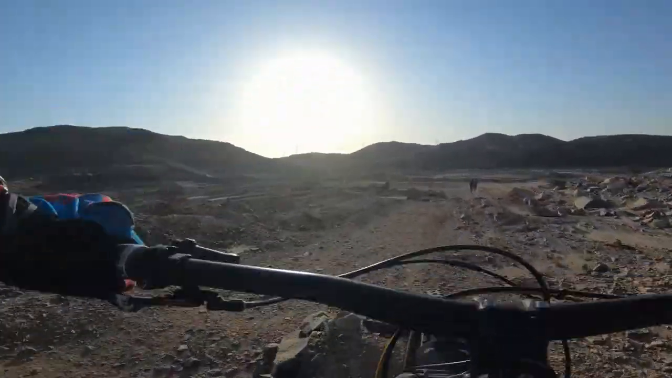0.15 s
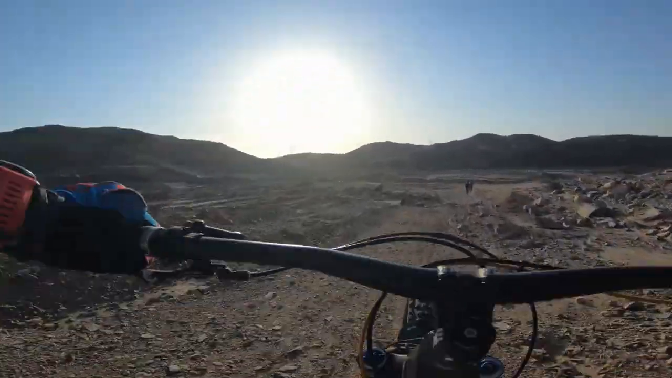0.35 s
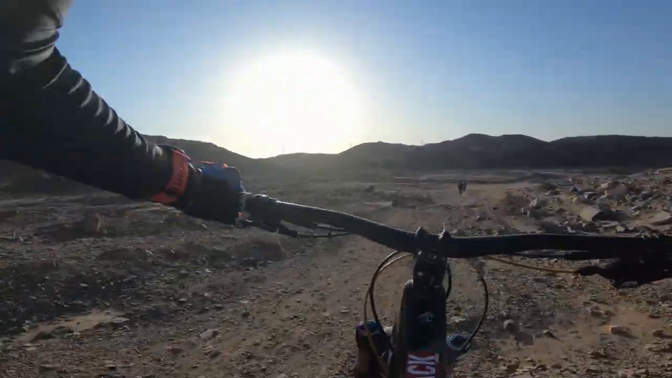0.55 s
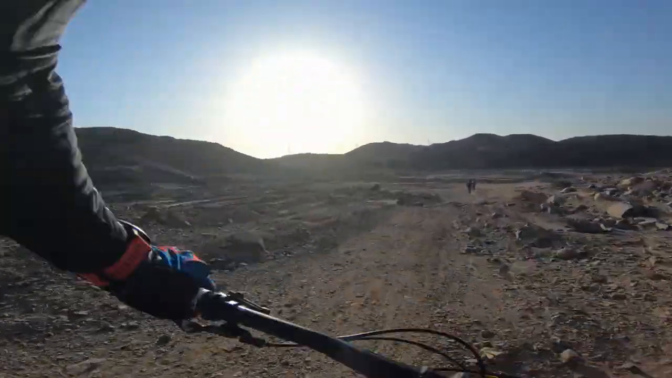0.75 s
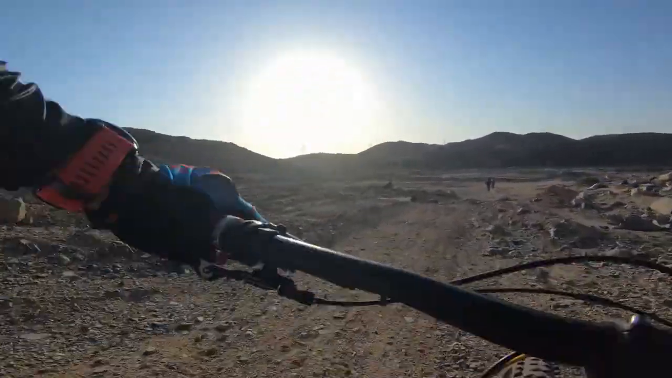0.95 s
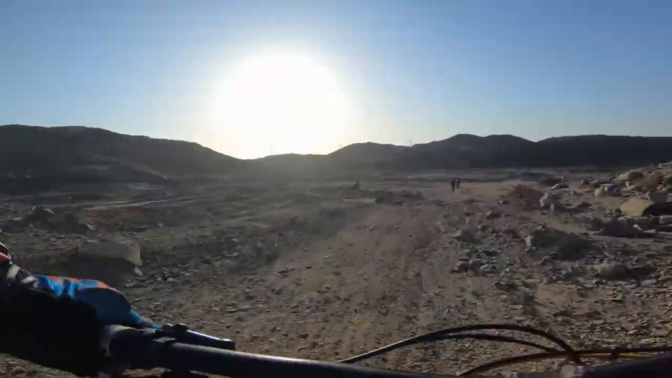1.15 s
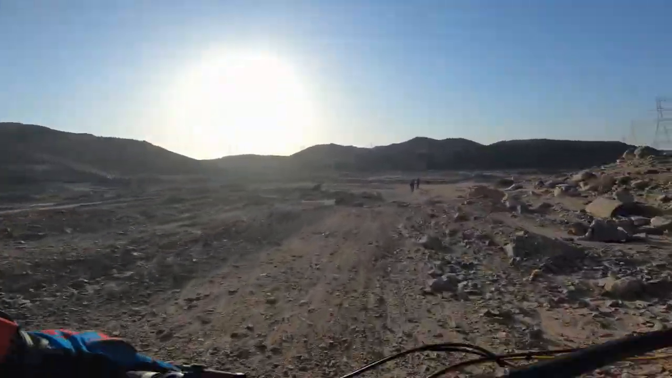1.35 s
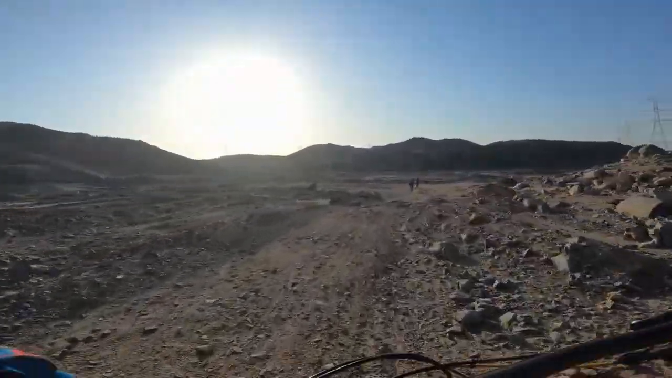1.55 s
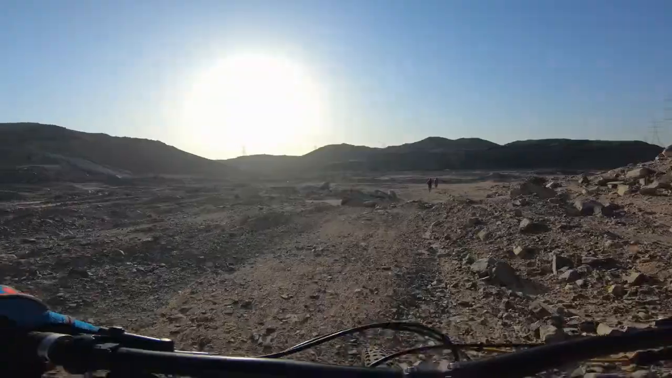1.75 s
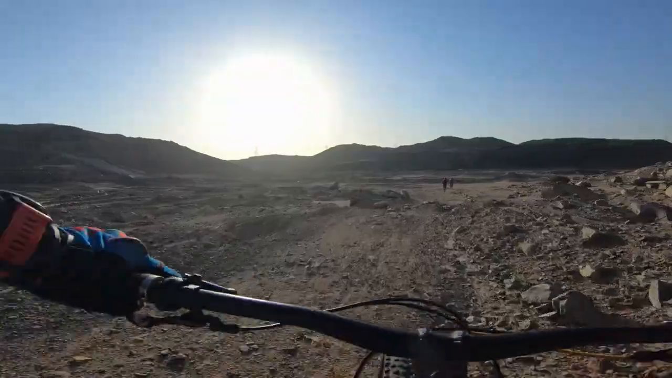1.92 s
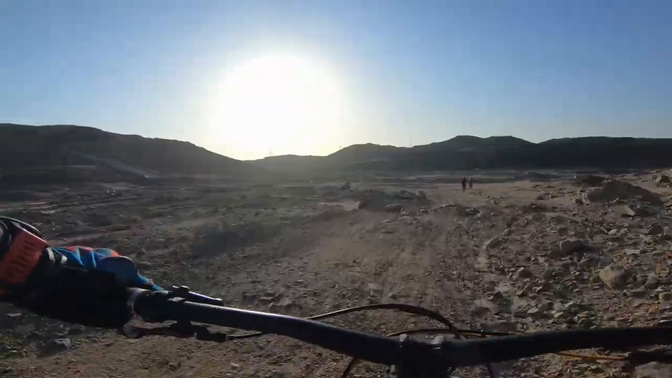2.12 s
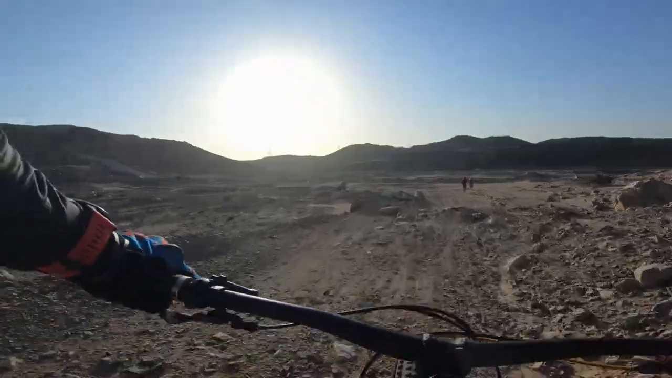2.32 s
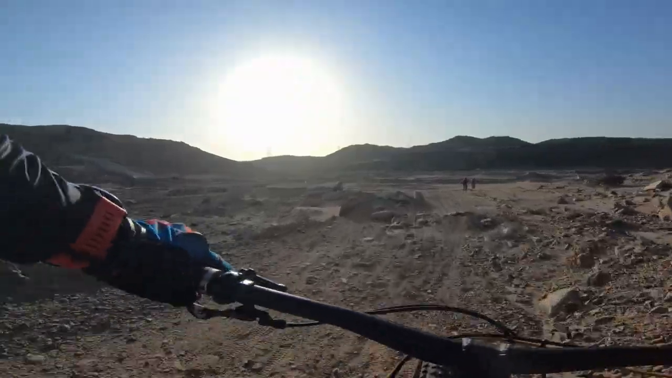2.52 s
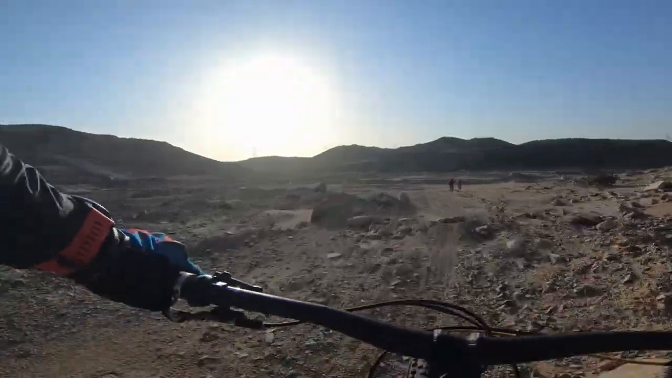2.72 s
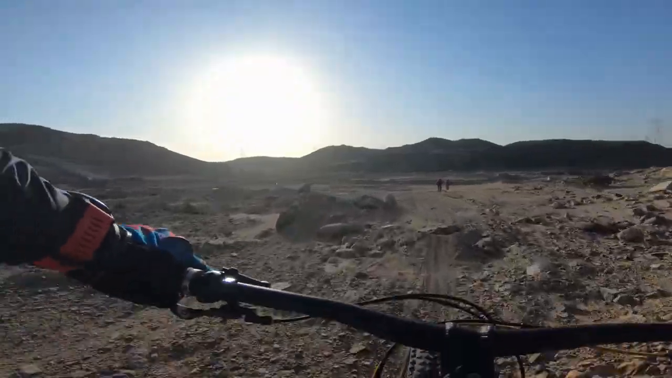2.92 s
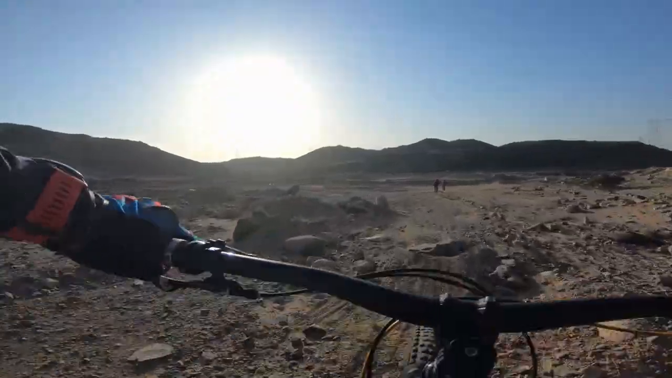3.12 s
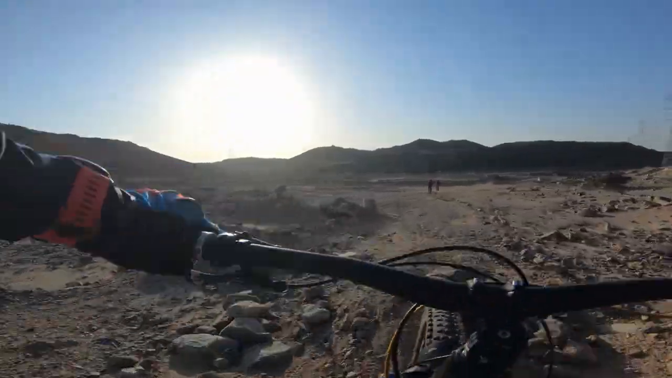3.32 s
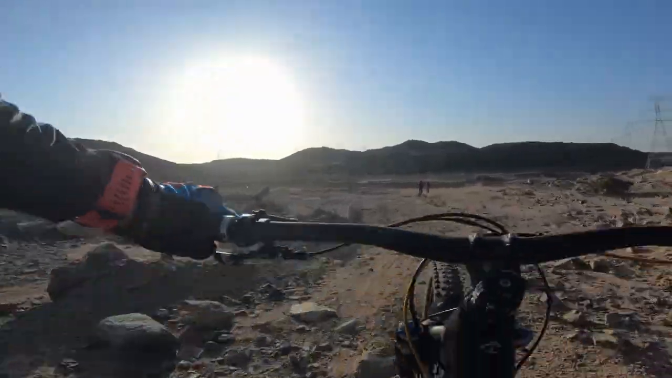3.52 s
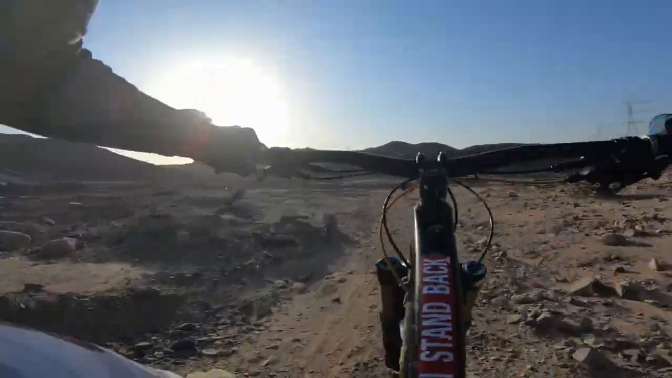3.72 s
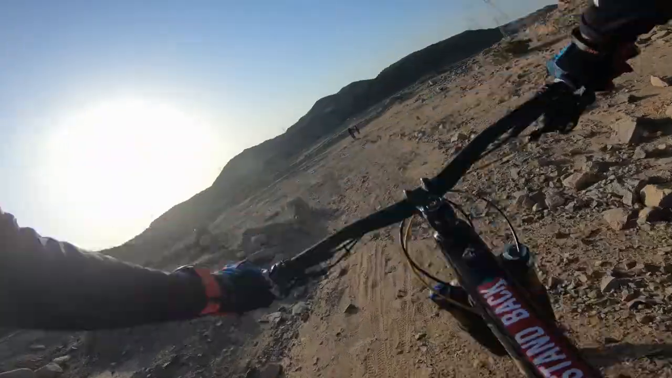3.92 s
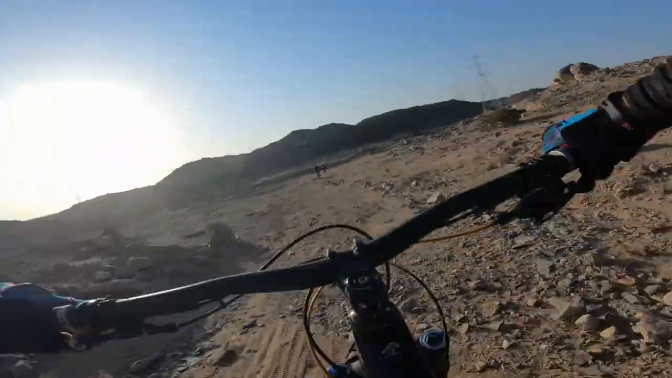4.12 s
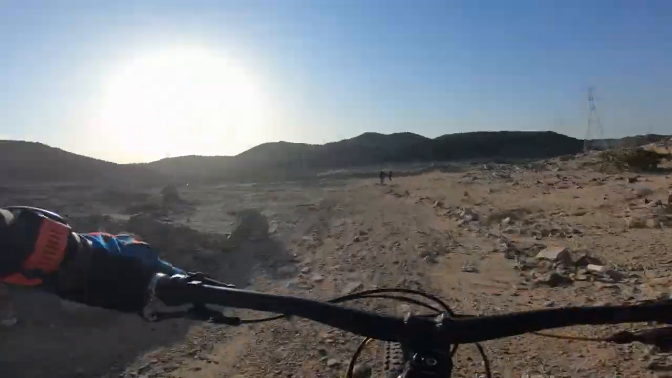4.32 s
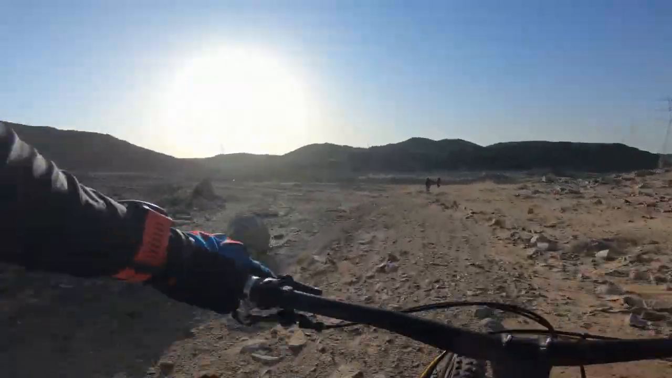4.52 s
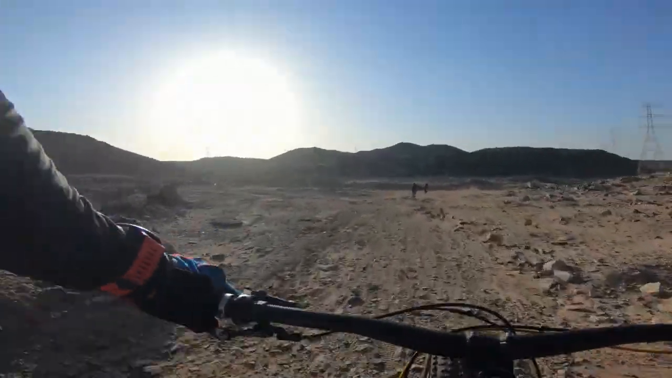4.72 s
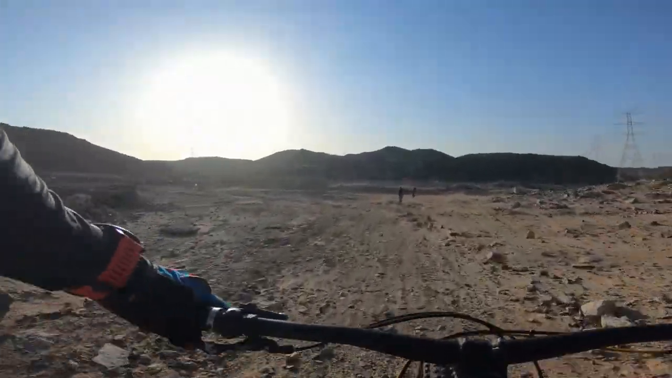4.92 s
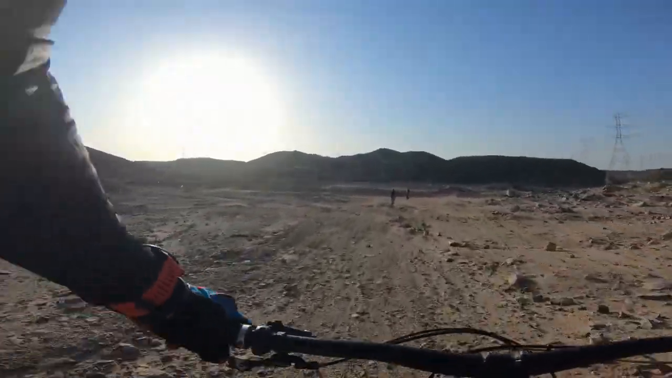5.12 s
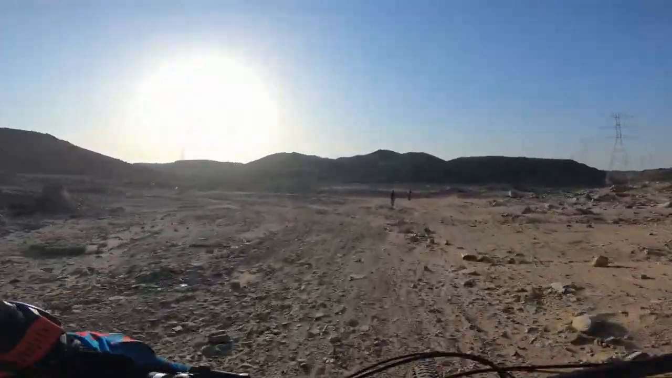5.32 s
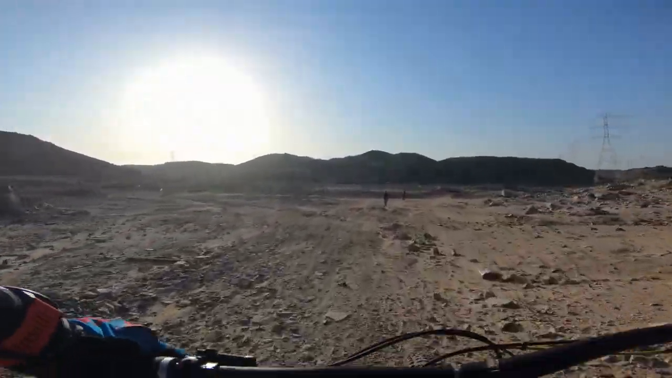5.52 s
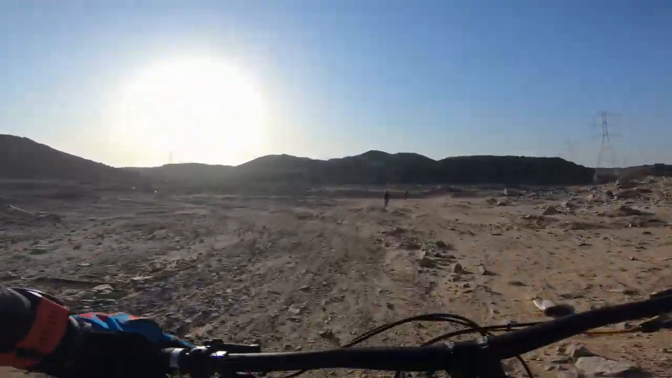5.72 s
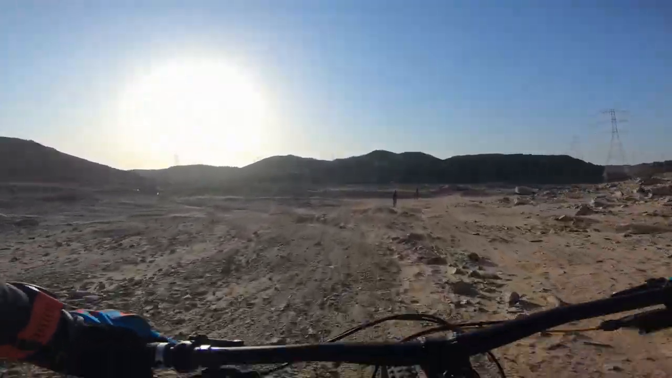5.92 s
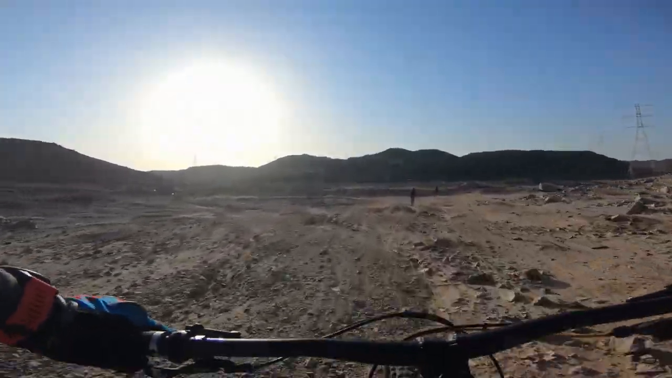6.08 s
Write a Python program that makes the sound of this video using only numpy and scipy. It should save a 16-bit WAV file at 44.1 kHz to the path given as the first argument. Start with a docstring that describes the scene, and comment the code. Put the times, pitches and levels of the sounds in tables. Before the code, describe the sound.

Low, gusty wind buffets a body-worn microphone outdoors as a coasting bicycle crunches over loose gravel. Stones knock, the chain clinks lightly and the camera mount clacks on bumps, over a thin freehub whirr. The gritty hiss builds with speed and eases briefly for a hop. The landing brings the loudest cluster of thumps and rattles, after which the crunching and wind carry on more evenly.

```python
"""Mountain bike on a stony trail

A bike coasts downhill and hops over a dirt bump, heard from a camera on the rider's chest.
Wind and jolts buffet the microphone, the camera mount clacks and its harness scrapes.
Gravel crunches under the drumming tyres, stones knock together and metal parts clink.
The freehub, the ratchet that lets the back wheel spin without pedalling, whirrs along."""
import sys
import numpy as np
from scipy import signal
from scipy.fft import rfft, irfft, next_fast_len
from scipy.io import wavfile
from scipy.ndimage import uniform_filter1d, map_coordinates

SR = 44100
rng = np.random.default_rng(int(sys.argv[2]) if len(sys.argv) > 2 else 0)


def wav_out(sig):
    """Save sig, one row per channel (or a flat mono array), as 16-bit PCM at SR to the path in sys.argv[1]."""
    wavfile.write(sys.argv[1], SR, np.round(np.clip(np.atleast_2d(sig).T, -1, 1) * 32767).astype(np.int16))


N = 271215
TIME = np.arange(N) / SR


def amp(db):
    """Turns decibels into a factor to multiply a sound by."""
    return 10 ** (np.asarray(db) / 20)


def unit(x):
    """Scales x to an average strength (rms) of 1."""
    return x / np.sqrt(np.mean(x ** 2) + 1e-20)


def levelled(x, span_s):
    """Evens out the strength of x to about 1 but keeps its fine grain."""
    count = max(int(span_s * SR), 8)
    power = uniform_filter1d(uniform_filter1d(x ** 2, count), count)
    return x / np.sqrt(abs(power) + 1e-12)


def follow(rows):
    """Joins a table's points with straight lines, giving each column a value at every sample."""
    times, *columns = np.transpose(rows)
    return [np.interp(TIME, times, column) for column in columns]


def stretch(start, end, fade_s=0.042):
    """1 between start and end, fading to 0 at both edges."""
    return np.clip(np.minimum(TIME - start, end - TIME) / fade_s + .5, 0, 1)


def add(mix, s, sound):
    """Mixes a sound in, starting at s seconds."""
    part = mix[max(round(s * SR), 0):][:len(sound)]
    part += sound[:len(part)]


def add_crest(mix, s, db, sound):
    """Mixes a sound in so that its loudest 2 ms fall at time s with the given level."""
    power = uniform_filter1d(sound ** 2, size=90)
    add(mix, s - power.argmax() / SR, amp(db) * sound / np.sqrt(power.max()))


def colour(x, tone):
    """Filters x with a tone curve of (Hz, dB) points, so clicks ring only after they strike."""
    size = next_fast_len(len(x) + 4096)
    hz, db = np.transpose(tone)
    log_hz = np.log(abs(np.fft.fftfreq(size, 1 / SR)) + 1)
    log_gain = np.log(amp(np.interp(log_hz, np.log(hz), db)))
    response = np.exp(signal.hilbert(log_gain).conj())
    return np.fft.ifft(np.fft.fft(x, size) * response).real[:len(x)]


def focus(tone, hz, cut_db, octaves=1):
    """Turns a tone curve down away from hz, reaching the full cut this many octaves away."""
    return [(f, db - cut_db * min(abs(np.log2(f / hz)) / octaves, 1)) for f, db in tone]


def drift(rate_hz):
    """A random wobble of strength 1, changing up to about the given rate."""
    size = 8192
    hz = np.fft.rfftfreq(size, TIME[-1] / size)
    slow = irfft(rfft(rng.standard_normal(size)) / (1 + (hz / rate_hz) ** 4), size)
    return unit(np.interp(TIME, np.linspace(0, TIME[-1], size), slow))


def grains(per_s, spread_db):
    """Random tiny hits; a few are much bigger than the rest (smaller if the spread is negative)."""
    size = amp(spread_db * np.minimum(rng.exponential(1, N), 4))
    return size * rng.choice([-1, 1], N) * (rng.random(N) < per_s / SR)


def knock(chatter, tone):
    """One firm hit amid loose chatter, ringing with the given tone."""
    force = chatter * rng.standard_normal(len(chatter))
    force[chatter.argmax()] += 1
    return colour(force, tone)


# rolling speed, written as a level (higher is faster): t/s, level/dB
SPEED = [(0.0, -62.5), (0.14, -61.5), (0.94, -66), (1.23, -65.5), (2.45, -59), (2.81, -60.5), (3.6, -55),
         (3.97, -63.5), (4.23, -65), (5.12, -65.5), (5.82, -62.5), (6.15, -61)]
# the tyres go light over a crest or in a hop: start/s, end/s, drop in crunch/dB
LIFTS = [(0.345, 0.756, 6.5), (3.553, 3.76, 5.5), (4.125, 4.347, 5)]
# rocky (+) and smooth (-) stretches: start/s, end/s, extra shaking/dB, extra crunch/dB
STRETCHES = [(-.1, 0.463, -5, -1), (0.59, 0.786, 9, -1.5), (0.778, 0.907, 11, 5.5),
             (0.959, 1.041, 10, -1.5), (1.024, 1.285, -2.5, -2), (1.297, 1.453, 5.5, 0.5),
             (1.59, 1.895, 0.5, 2.5), (1.955, 2.099, 3, 2.5), (2.784, 3.496, 2, 1.4), (3.732, 3.834, 7, 5),
             (3.834, 3.977, 4, -5.5), (3.95, 4.13, 7.5, 0.5), (4.354, 5.1, -1.5, -1),
             (5.309, 6.299, 2.5, 2.5)]

def trail(cruise_db=-60.5):
    """The ride at every sample, in dB: speed above cruising, lift, extra shaking, extra crunch."""
    speed_db = follow(SPEED)[0] - cruise_db
    lift_db = sum(db * stretch(start, end) for start, end, db in LIFTS)
    shake_db, rocks_db = sum(np.outer(dbs, stretch(start, end)) for start, end, *dbs in STRETCHES)
    return speed_db, lift_db, shake_db, rocks_db


# strength of the air flow over the microphone: t/s, level/dB
AIR_FLOW = [(0.0, -28), (0.1, -22.5), (0.33, -34), (0.45, -24.5), (0.65, -25.5), (0.99, -33.5), (1.47, -27),
            (1.93, -34.5), (2.91, -30), (3.58, -32.5), (3.9, -25), (4.08, -35.5), (4.3, -35), (4.5, -30.5),
            (5.94, -36), (6.15, -34.5)]
# tone of the big swirls and of the small swirls of air: f/Hz, level/dB
RUMBLE_TONE = [(8.8, -31.5), (15, -8), (43, 5), (77, 1.5), (111, -2.5), (162, -11.5), (296, -28.5),
               (335, -24.5), (400, -45.5), (520, -50), (880, -120)]
FLUTTER_TONE = [(100, -23.5), (180, 9.5), (240, -0.5), (320, -2.5), (420, -5.5), (600, -15.5), (900, -22),
                (1500, -40), (4000, -75.5)]

def wind(shake_db, lift_db, cruise_flow_db=-34.5, gusty_db=2.5):
    """Big swirls of air rumble on the microphone; small ones flutter, more when the rider shakes."""
    flow_db = follow(AIR_FLOW)[0] - cruise_flow_db + gusty_db * drift(rate_hz=6.1)
    churn = churning_air()
    rumble = levelled(colour(rng.standard_normal(N), RUMBLE_TONE), span_s=0.043)
    swirls = rng.standard_normal(N) * amp(3.06 * drift(rate_hz=130))
    flutter = levelled(colour(swirls, FLUTTER_TONE), span_s=0.093)
    rumble_gain = amp(-32 + flow_db + 0.17 * shake_db) + amp(-16) * churn
    flutter_gain = amp(-46.5 + shake_db - 0.1 * lift_db) + amp(-30) * churn
    return rumble * rumble_gain + flutter * flutter_gain


# gusts and jolts that shove the microphone: t/s, level/dB, f/Hz
SHOVES = [(0.045, -18, 70), (.073, -37, 79), (0.096, -21, 90), (0.115, -18, 95), (0.208, -12, 70),
          (0.494, -12.5, 89), (0.621, -19, 91), (0.69, -7, 72), (0.78, -24, 69), (0.829, -25, 75.6),
          (0.852, -10, 148), (1.1, -16, 62), (1.227, -19, 77), (1.278, -15, 52), (1.319, -13, 100),
          (1.409, -14, 100), (1.429, -18, 104), (1.443, -12, 77.5), (1.471, -15, 116), (1.648, -16, 62),
          (1.816, -11, 104), (2.685, -13, 129), (2.803, -14.5, 75), (2.817, -12, 106), (2.898, -17.5, 75),
          (3.043, -19, 59.5), (3.243, -18.5, 119), (3.269, -14, 141), (3.748, -13, 86.6), (3.769, -7.5, 63),
          (3.807, -13, 99), (3.819, -21, 111.2), (3.862, -7, 107), (3.877, -16, 110), (3.905, -10, 98),
          (3.93, -15, 109), (3.966, -9.5, 83), (4.066, -14, 63.5), (4.299, -15.5, 61), (4.35, -15.5, 90),
          (4.416, -15, 66), (4.478, -7.5, 58.3), (4.506, -19, 60), (4.698, -16, 81), (4.802, -23, 80),
          (4.839, -15, 84.2), (5.486, -18.5, 76.6), (5.563, -12.5, 66.2), (6.13, -19, 98)]

def thumps(cycles=0.54, phase_rad=1.0):
    """Each shove is a smooth swing of pressure, a dip and then a crest, gone in a cycle or two."""
    out, t = np.zeros(N), np.arange(-2000, 2000) / SR
    for s, db, hz in SHOVES:
        swing = np.sin(2 * np.pi * hz * t + phase_rad) / np.cosh(t * hz * 1.53 / cycles)
        add(out, s + t[0], amp(db) * swing * signal.windows.tukey(len(t), .5))
    return out


def churning_air(width_s=0.013):
    """How strongly the air churns: a brief swell around every shove."""
    crests, t = np.zeros(N), np.arange(-6000, 6001) / SR
    for s, db, _ in SHOVES:
        add(crests, s, np.array([amp(db)]))
    return signal.oaconvolve(crests, np.exp(-(t / width_s) ** 2), "same")


# hard jolts that drag the camera harness: start/s, end/s, level/dB
SCRAPES = [(0.68, 0.694, -42.5), (1.405, 1.422, -37.5), (3.776, 3.804, -48), (3.857, 3.867, -33.5),
           (3.876, 3.88, -35), (3.885, 3.905, -34), (3.95, 3.983, -42.5), (3.993, 4.009, -38.5),
           (4.041, 4.052, -33.5)]
# tone of the rubbing strap: f/Hz, level/dB
STRAP_TONE = [(200, -24), (450, -19), (800, 0), (1080, 8.5), (1500, 2.5), (2100, -1.5), (3000, -13),
              (4200, -16.5), (6000, -35.5), (9000, -44), (13000, -70)]

def harness_scrapes(ragged_db=6.5):
    """The harness drags over the jacket in a ragged run of tiny slips."""
    gain = sum(amp(db) * stretch(start, end, fade_s=0.0068) for start, end, db in SCRAPES)
    slips = grains(per_s=2100, spread_db=5.5) * amp(ragged_db * drift(rate_hz=250))
    return gain * levelled(colour(slips, STRAP_TONE), span_s=0.016)


# bumps that rattle the camera mount: t/s, relative level/dB, length/s, f/Hz, treble edge/Hz
CLACKS = [(0.117, -31.5, 0.0034, 350, 1800), (0.581, -36, 0.0075, 490, 695),
          (0.662, -35, 0.0045, 800, 1000), (0.686, -33, 0.0056, 300, 2500), (0.853, -21, 0.0041, 245, 524),
          (1.193, -42, 0.0025, 900, 1400), (1.203, -36, 0.0048, 1040, 1350),
          (1.353, -31, 0.0082, 400, 1190), (1.407, -23, 0.0057, 1150, 1500),
          (1.465, -26.5, 0.0065, 500, 850), (1.819, -28, 0.0055, 395, 3000),
          (2.546, -33, 0.0062, 600, 2000), (2.645, -30, 0.0035, 503, 1000),
          (2.677, -25.5, 0.013, 400, 1000), (2.829, -38, 0.0048, 600, 2000), (3.275, -27, 0.022, 397, 910),
          (3.757, -23.5, 0.0035, 604, 890), (3.77, -22, 0.0056, 503, 800), (3.787, -26, 0.0037, 1200, 1700),
          (3.808, -25.5, 0.0076, 900, 1400), (3.815, -21.5, 0.0051, 600, 1000),
          (3.851, -23, 0.003, 1210, 1790), (3.858, -19.5, 0.005, 686, 4500),
          (3.873, -20.5, 0.0051, 1060, 2800), (3.881, -19.5, 0.0014, 603, 2520),
          (3.893, -12, 0.0051, 800, 3000), (3.901, -16, 0.0021, 810, 3800),
          (3.922, -21.5, 0.004, 800, 1700), (3.93, -21, 0.0042, 450, 900), (3.95, -18, 0.0077, 700, 1600),
          (3.964, -22, 0.0042, 550, 900), (3.979, -25.5, 0.0063, 557, 1200),
          (3.996, -27.5, 0.014, 1130, 1250), (4.188, -35.5, 0.0024, 850, 1200),
          (4.197, -37.5, 0.0061, 987, 1190)]
# tone of the plastic mount: f/Hz, level/dB
MOUNT_TONE = [(120, -7.5), (230, 9.5), (330, 2), (400, 1), (500, 3), (610, -2.5), (720, -1.5), (950, -7),
              (1300, -7.5), (1900, -18), (2800, -27.5), (4500, -39.5), (9000, -65), (13000, -90.5)]

def mount_clacks(gain_db=-1, chatter_db=-17, tail_db=-15, dull_db=18):
    """A jolt makes the plastic mount chatter for a moment; soft jolts sound duller."""
    out, t = np.zeros(N), np.arange(-600, 2400) / SR
    for s, db, length, hz, edge_hz in CLACKS:
        burst = np.exp(-(1.6 * t / length) ** 2)
        tail = amp(tail_db) * (t >= 0) * np.exp(-abs(t) / length / 2)
        tone = [(f, level - dull_db * np.clip(np.log2(f / edge_hz), 0, 1))
                for f, level in focus(MOUNT_TONE, hz, cut_db=4)]
        add_crest(out, s, db + gain_db, knock(amp(chatter_db) * (burst + tail), tone))
    return out


# runs of ticks from the camera's own electronics: start/s, end/s, level/dB
TICK_RUNS = [(3.76, 3.788, -40), (3.808, 3.813, -31.5), (3.829, 3.837, -40)]

def camera_ticks(ticks_per_s=188, decay_s=.0001, spread_db=1):
    """The camera's electronics make quick runs of faint, evenly spaced dry ticks."""
    out, t = np.zeros(N), np.arange(100) / SR
    for start, end, db in TICK_RUNS:
        for s in np.arange(start, end, 1 / ticks_per_s):
            peak = amp(db + spread_db * rng.standard_normal()) * rng.choice([-1, 1])
            add(out, s, peak * np.exp(-t / decay_s))
    return out


# notes at which the bike's metal parts ring: f/Hz, level/dB, ring time/s
METAL_NOTES = [(2574, -1, 0.15), (3680, -5.5, 0.11), (4600, -2, 0.19), (5200, -3.5, 0.13), (6800, -1, 0.24),
               (7400, -1.5, 0.25)]

def metal_ringing(bike):
    """Grit, ticks and clinks leave a faint ring in the bike's metal parts."""
    t = np.arange(12000) / SR
    rings = np.zeros(len(t))
    for hz, db, ring_s in METAL_NOTES:
        scale = 2 * np.log(1000) / (ring_s * SR)  # so that a longer ring does not build up louder
        rings += scale * amp(db - 60 * t / ring_s) * np.sin(2 * np.pi * hz * t)
    return signal.oaconvolve(bike, rings)[:N]


# the chain and cables clink: t/s, level/dB, ring time/s, f/Hz
CLINKS = [(0.303, -45.5, 0.043, 7050), (0.373, -46.5, 0.07, 3800), (0.455, -53, 0.06, 3850),
          (0.568, -45.5, 0.026, 3700), (0.66, -47, .018, 4000), (.69, -48, 0.017, 3550),
          (0.795, -52, .026, 4930), (0.816, -44, 0.022, 3670), (0.851, -45, 0.035, 3880),
          (0.887, -50, 0.033, 4600), (0.933, -39, 0.016, 3700), (1.348, -46.5, 0.031, 3520),
          (1.406, -48, 0.08, 2950), (1.638, -44.5, 0.018, 6500), (1.817, -47, .02, 3660),
          (2.041, -40.5, 0.029, 3800), (2.064, -48, 0.038, 3400), (2.827, -49, .03, 3566),
          (3.481, -28, 0.018, 4900), (3.527, -36.5, 0.11, 6000), (3.977, -48, 0.022, 5970),
          (4.014, -46, 0.013, 4500), (4.042, -43.5, 0.04, 4374), (4.741, -50, 0.034, 3000),
          (4.925, -45.5, 0.022, 4670), (5.096, -47, 0.022, 4064), (5.442, -42, 0.027, 3600)]
# tone of struck metal: f/Hz, level/dB
METAL_TONE = [(1200, -14), (1800, -1), (2600, 1), (3800, 2), (4600, -1), (5600, 0), (6800, -6), (7600, -4),
              (8600, -12), (10000, -34), (14000, -60)]

def chain_clinks(rise_s=0.00071):
    """Metal taps metal in bright, short clinks, each strongest around its own pitch."""
    out, t = np.zeros(N), np.arange(4000) / SR
    for s, db, ring_s, hz in CLINKS:
        contact = (1 - np.exp(-t / rise_s)) * amp(-60 * t / ring_s)
        clink = colour(rng.standard_normal(len(t)) * contact, focus(METAL_TONE, hz, cut_db=9))
        add(out, s, amp(db) * clink / abs(clink).max())
    return out


# the tread's whine, rising until the wheels leave the ground: t/s, f/Hz, level/dB
WHINE = [(3.15, 2550, -80), (3.27, 2563, -57), (3.37, 2655, -53), (3.46, 2770, -53), (3.54, 2630, -63),
         (3.62, 2660, -58), (3.68, 2700, -64), (3.75, 2700, -69)]

def tread_whine(width_hz=90, waver_hz=35, flicker_db=2):
    """At top speed the tyre knobs sing in one narrow, unsteady band of noise."""
    hz, level_db = follow(WHINE)
    note = np.exp(2j * np.pi * np.cumsum(hz + waver_hz * drift(rate_hz=30)) / SR)
    pole = np.exp(-np.pi * width_hz / SR)
    noise = rng.standard_normal(N) + 1j * rng.standard_normal(N)
    slow_noise = signal.lfilter([1], np.poly([pole, pole]), noise)
    band = levelled((slow_noise * note).real, span_s=0.064)
    return band * amp(level_db + flicker_db * drift(rate_hz=21))


# the freehub's whirr: t/s, f/Hz, level/dB
WHIRR = [(0, 2600, -59), (.37, 2600, -56.5), (.65, 2519, -56), (.95, 2506, -63), (1.35, 2508, -59.5),
         (1.68, 2540, -58.5), (2.1, 2496, -59.5), (2.37, 2562, -53.5), (3.05, 2509, -56.5),
         (3.4, 2603, -61), (3.52, 2525, -53), (3.63, 2594, -46), (3.72, 2450, -55), (3.8, 2520, -62),
         (4.35, 2507, -58), (4.68, 2540, -56), (4.95, 2514, -57.5), (5.1, 2490, -52), (5.3, 2500, -58),
         (5.62, 2520, -56), (5.9, 2537, -54), (6.15, 2514, -51.5)]
# tone of the hub's shell when the whirr is at shell_hz: f/Hz, level/dB
SHELL_TONE = [(1800, -30.5), (2250, -14), (2420, -5), (2530, -3), (2660, -6.5), (2850, -21.5), (3450, -25),
              (3850, -13.5), (4300, -34), (5100, -26.5), (5700, -34), (6900, -43), (7400, -37.5),
              (9000, -55.5), (12000, -78.5)]

def freehub(shell_hz=2530, flicker_db=2.0, waver=0.019):
    """Small catches skip unevenly over the ratchet and ring the hub's shell in a wavering whirr."""
    hz, level_db = follow(WHIRR)
    ticks = grains(per_s=500, spread_db=-2.5) * amp(flicker_db * drift(rate_hz=36))
    rasp = levelled(colour(ticks, SHELL_TONE), span_s=0.26)
    position = np.cumsum(hz / shell_hz + waver * drift(rate_hz=8))  # reading faster lifts the pitch
    return amp(level_db) * map_coordinates(rasp, [position], order=3, mode="wrap")


# hollow tone of an air-filled tyre: f/Hz, level/dB
TYRE_TONE = [(200, -25.5), (380, -8), (500, 1), (640, -2), (760, -4), (950, -17.5), (1500, -35.5),
             (4000, -68.5)]

def tyre_drumming(speed_db, lift_db, shake_db, cruise_db=-51):
    """The tyres drum over the grit, and fall quiet on smooth ground or when they go light."""
    drum = levelled(colour(grains(per_s=2000, spread_db=1), TYRE_TONE), span_s=0.21)
    return drum * amp(cruise_db + 0.27 * speed_db - lift_db + 1.1 * np.minimum(shake_db, 0))


# larger stones under the tyres: t/s, level/dB, f/Hz
STONES = [(0.072, -33, 1150), (0.692, -38, 1700), (0.761, -32, 1300), (0.837, -35.5, 1600),
          (0.88, -37, 1510), (0.965, -37, 1430), (0.993, -39, 1490), (1.078, -40, 1700), (1.147, -44, 1400),
          (1.304, -37.5, 1657), (1.323, -37.5, 1550), (1.458, -42, 1480), (1.603, -37, 1290),
          (1.612, -35, 1590), (1.638, -30.5, 1450), (1.747, -36, 1400), (1.801, -29.5, 1500),
          (1.871, -34.5, 1660), (1.974, -40, 1560), (2.002, -41, 1430), (2.044, -53, 1630),
          (2.077, -35, 1400), (2.084, -30, 1480), (2.232, -28, 1476), (2.827, -28.5, 1530),
          (2.872, -33.5, 1390), (2.961, -28.5, 1295), (3.099, -33.5, 1370), (3.146, -38, 1510),
          (3.318, -35, 1350), (3.483, -42, 1700), (3.525, -32.5, 1520), (4.045, -40, 1820),
          (4.424, -38, 1560), (4.565, -37.5, 1433), (4.601, -36, 1160), (4.743, -37, 1570),
          (5.185, -34.5, 1660), (5.285, -36, 1665), (5.367, -34.5, 1500), (5.506, -38, 1300),
          (5.66, -35.5, 1680), (5.716, -31.5, 1450), (5.785, -39, 1500), (5.896, -38.5, 1500),
          (6.045, -35, 1475)]
# tone of a knocked stone: f/Hz, level/dB
STONE_TONE = [(400, -17.5), (900, -5), (1300, 0), (1750, 1.5), (2200, -14), (3700, -20), (5000, -36.5),
              (9000, -58.5), (13000, -78.5)]

def stone_knocks(chatter_db=-19, snap_s=.0025, spray_db=-19, spray_s=0.026):
    """A stone snaps against its neighbours: a short dull knock, then a spray of grit."""
    out, t = np.zeros(N), np.arange(2600) / SR
    chatter = amp(chatter_db) * (np.exp(-t / snap_s) + amp(spray_db) * np.exp(-t / spray_s))
    for s, db, hz in STONES:
        add_crest(out, s, db, knock(chatter, focus(STONE_TONE, hz, cut_db=4, octaves=0.5)))
    return out


# tones of crunching gravel, hissing sand and its highest fizz: f/Hz, level/dB
GRAVEL_TONE = [(300, -11.5), (500, -5), (750, -5.5), (930, -3), (1200, 4), (1480, 6), (1780, 4.5),
               (2150, -7), (2900, -11), (3800, -12), (4300, -20), (6000, -32.5), (9000, -67.5)]
SAND_TONE = [(1500, 5.5), (3000, 1.5), (3900, -2.5), (4300, -2), (5150, 2.5), (5900, -6), (6400, -4.5),
             (6850, -9), (7400, -3), (8200, -8), (9200, -16.5), (11000, -33.5), (15000, -50)]
FIZZ_TONE = [(6000, -28.5), (8400, 3), (9400, 8), (10500, -12), (12000, -28.5), (15000, -47.5)]

def gravel_crunch(speed_db, lift_db, rocks_db, surge_db=3.1):
    """Tyre knobs bite into gravel in clumps and throw up fine sand, which sizzles at top speed."""
    bite = drift(rate_hz=30)
    gravel = grains(per_s=2800, spread_db=3.2) * amp(1.7 * bite + surge_db * drift(rate_hz=7))
    grit = grains(per_s=4400, spread_db=2) * amp(0.95 * bite)
    crunch = levelled(colour(gravel, GRAVEL_TONE), span_s=0.059)
    sand = levelled(colour(grit, SAND_TONE), span_s=0.088)
    fizz = unit(colour(grit * amp(2 * bite), FIZZ_TONE))
    crunch_db = -46 + 0.56 * speed_db - lift_db + rocks_db
    sand_db = -55.5 + 1.35 * speed_db + 0.34 * rocks_db
    fizz_db = -90 + 1.7 * speed_db
    return crunch * amp(crunch_db) + sand * amp(sand_db) + fizz * amp(fizz_db)


def scene():
    """Camera noises and the bike, all close by in the open air, with no echo."""
    speed_db, lift_db, shake_db, rocks_db = trail()
    camera = wind(shake_db, lift_db) + thumps() + mount_clacks() + harness_scrapes() + camera_ticks()
    tyres = gravel_crunch(speed_db, lift_db, rocks_db) + tyre_drumming(speed_db, lift_db, shake_db)
    bike = tyres + stone_knocks() + freehub() + tread_whine() + chain_clinks()
    return (camera + bike + metal_ringing(bike))[None]


def record(dry, cutoff_hz=15700):
    """The camera cuts off the very highest treble."""
    lowpass = signal.firwin(511, cutoff_hz, window=("kaiser", 9), fs=SR)
    return signal.oaconvolve(dry, lowpass[None], "same")


dry = scene()
out = record(dry)
wav_out(out)
```